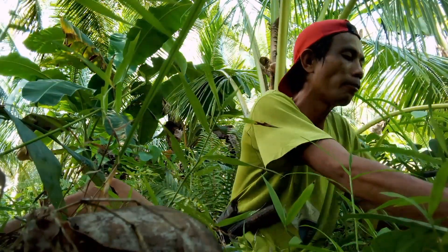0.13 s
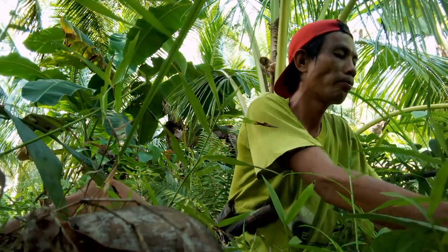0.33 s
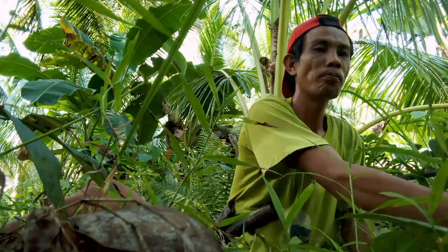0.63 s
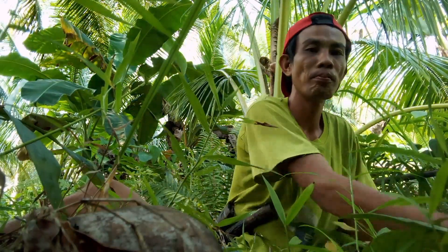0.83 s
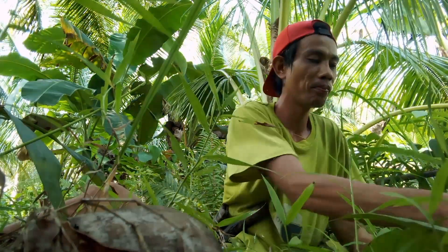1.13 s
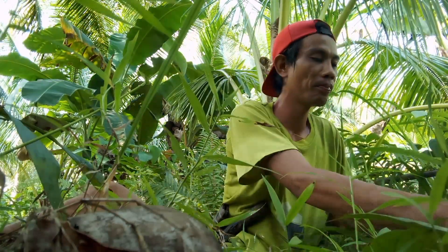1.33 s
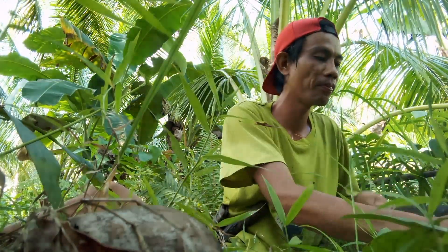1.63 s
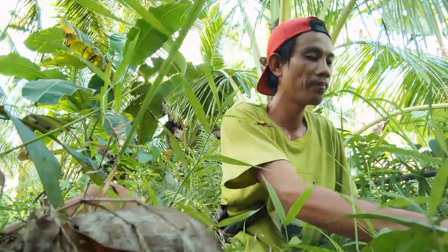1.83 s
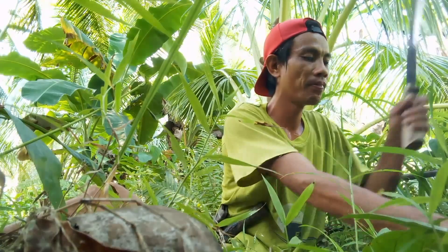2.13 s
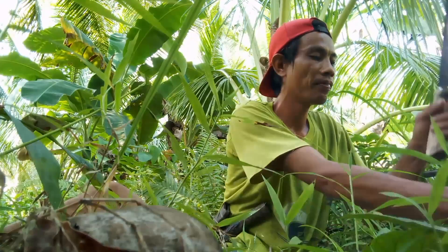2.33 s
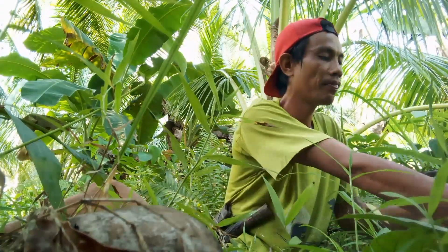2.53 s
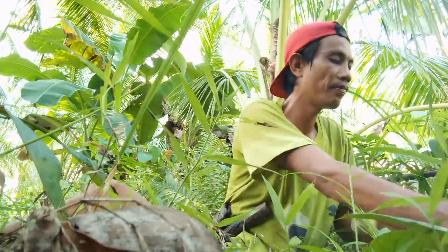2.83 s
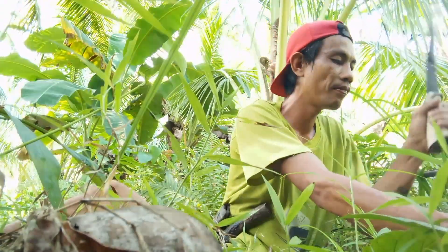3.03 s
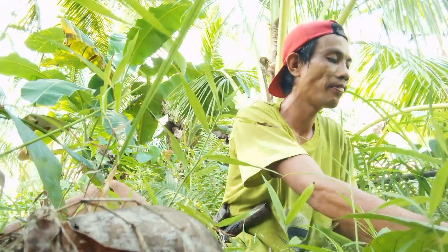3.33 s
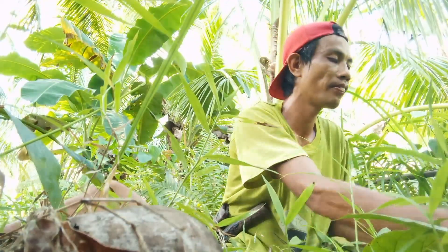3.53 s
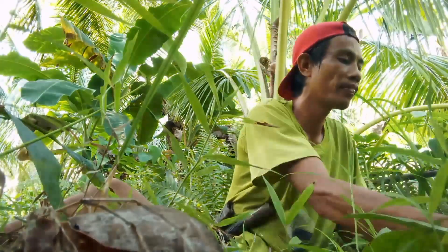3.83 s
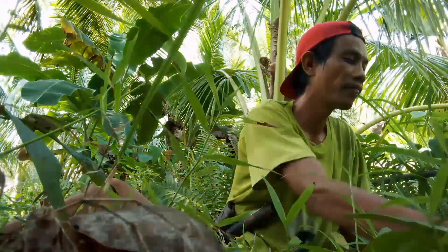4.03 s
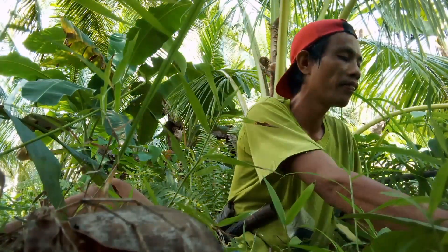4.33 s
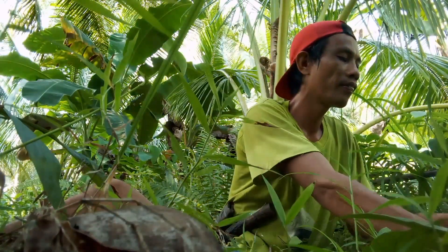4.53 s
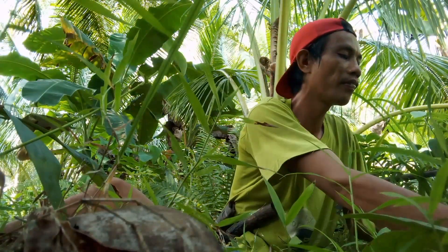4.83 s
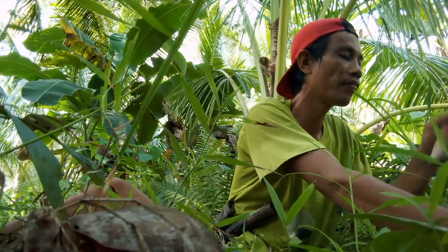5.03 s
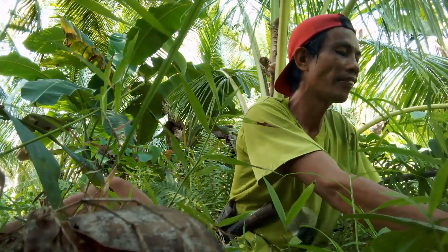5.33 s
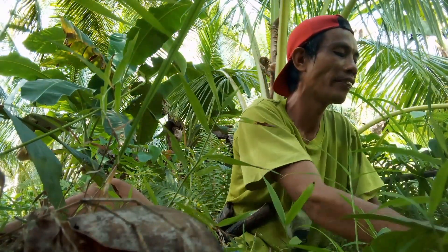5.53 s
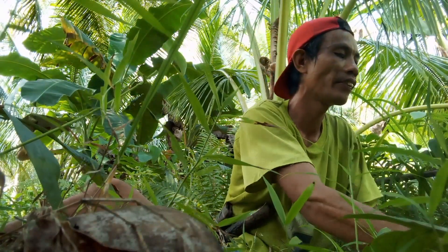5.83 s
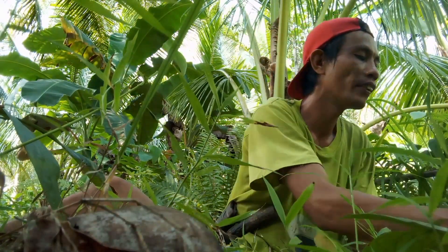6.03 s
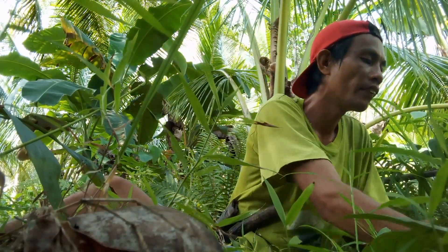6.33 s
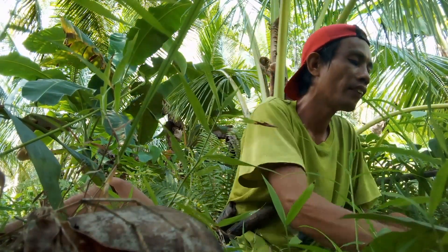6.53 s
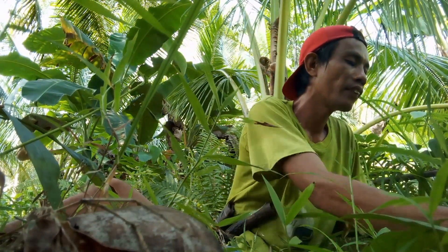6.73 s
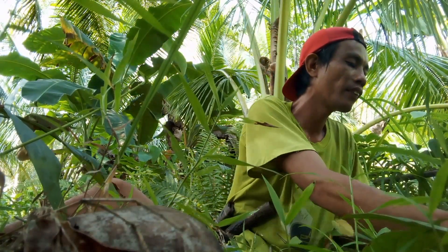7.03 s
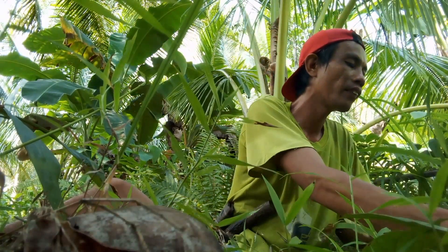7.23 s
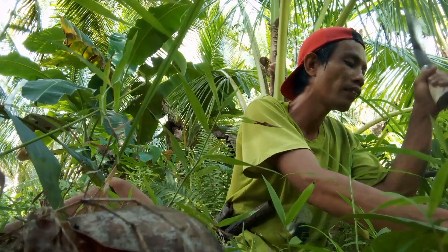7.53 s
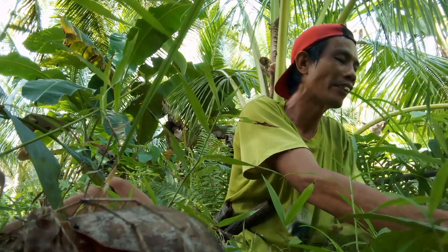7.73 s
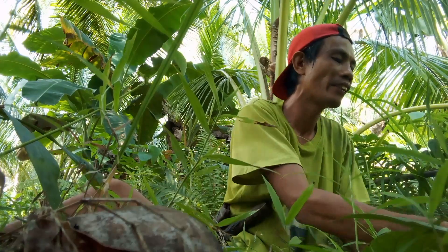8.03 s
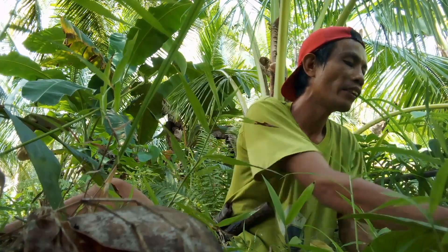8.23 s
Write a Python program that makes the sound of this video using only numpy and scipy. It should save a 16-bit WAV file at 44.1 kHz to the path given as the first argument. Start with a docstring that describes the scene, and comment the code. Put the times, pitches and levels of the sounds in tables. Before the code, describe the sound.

Outdoors in a grove, close to a small microphone, a very quiet low rumble lies under a thin, high, pulsing insect song. At 0.25 s a knife whistles briefly and hits a young coconut: wet pop, crunch, hollow knock around 300 to 400 Hz, slight steel ring. At 0.8 s the husk is prised open in a very short, loud, creaking run of slips, sinking in pitch. Until 3 s there is soft grass rustle, tiny snaps, faint squeaks, scraping and weak taps. A second, duller, rounder blow lands at 3.3 s; leaves swish around 4.05 s and fibres snap at 4.6 s. The third, sharp and cracking with a ground thud, falls at 5.4 s. From 5.9 to 6.8 s the nut scrapes, squeaks and groans amid rustling. After a light tap at 7.3 s, a somewhat softer, hollow chop lands at 7.8 s, then gentle rustling ends it.

```python
"""A low outdoor rumble lies under the high thin song of an insect; at once a knife chops a young coconut.
Full swings whistle, nick the skin and ring the steel; each blow pops and crunches wet husk, knocks the
hollow nut and thuds the ground. Once the husk is prised apart in a creaking run of slips.
Between blows grass rustles in clumped noise, the nut scrapes and hums, fibres snap and wet husk squeaks.
Tones are decaying or swelling sines, textures are coloured noise, and the grove adds a faint tail."""
import sys
import numpy as np
from scipy import signal
from scipy.fft import rfft, irfft
from scipy.io import wavfile
from scipy.ndimage import uniform_filter1d

SR = 44100
rng = np.random.default_rng(int(sys.argv[2]) if len(sys.argv) > 2 else 0)


def dump_mix(stems):
    """Bounce the given channels to the path in sys.argv[1] as a 16-bit WAV at rate SR."""
    frames = np.atleast_2d(stems).T  # one column per channel
    limited = np.clip(frames, -1, 1)  # hard clip at full scale
    pcm = np.round(limited * 32767).astype(np.int16)
    wavfile.write(sys.argv[1], SR, pcm)


N = 369558
TIME = np.arange(N) / SR
AGE = np.arange(SR // 2) / SR  # seconds since an event began
HZ = np.fft.rfftfreq(N, 1 / SR)

# Hard and soft blows on the nut: impact_s, knock_db, knock_pitch_hz, push_s, rebound_delay_s,
# rebound_db (re knock), hollow_ring_db, hollow_pitch_hz, after_ring_t60_s, ground_thud_db,
# wedge_pop_db, pop_pitch_hz, crunch_db, crunch_decay_s, edge_hiss_db
BLOWS = [(0.254, -7, 418, 0.00314, 0.013, -14, -5.5, 290, 0.26, -22.5, -11, 675, -9, 0.0031, -24.5),
         (0.4227, -35.5, 360, 0.005, 0.0066, -4, -19, 297, 0.12, -65.5, -35, 1400, -38.5, 0.0092, -71),
         (1.4201, -39, 407, 0.0025, .011, -17, -38, 318, 0.14, -64, -59, 755, -47, 0.0034, -66),
         (1.952, -31.5, 314, 0.0067, .0135, -11, -19.5, 276.4, 0.12, -32.5, -58, 547, -54.5, 0.0043, -72),
         (3.3072, -8, 374.6, 0.0065, .0092, -9, -31, 332, .06, -32, -27.5, 760, -20.5, 0.0043, -40),
         (3.4205, -37.5, 341, 0.01, .013, -2, -29.5, 273, 0.29, -28.5, -41, 576, -35, 0.0035, -46),
         (3.7888, -39, 394, 0.009, 0.011, -13, -33, 272, .061, -34.5, -29.5, 535, -40, 0.0052, -55),
         (4.6754, -30.5, 406, 0.0044, 0.013, -9, -22.5, 279.6, 0.28, -27.5, -32.5, 948, -35.5, 0.0076, -53),
         (5.432, -7, 388.4, 0.0051, 0.006, -7.5, -20, 275.3, 0.4, -11, -5.5, 680, -8.5, 0.0024, -20.5),
         (7.2674, -33, 399.7, 0.01, .0114, -12.8, -31, 265, 0.11, -23.5, -32.5, 740, -44.5, 0.0047, -57),
         (7.8016, -15, 390, 0.0107, .0115, -11.5, -8.8, 270.2, 0.33, -33, -9.5, 594, -17.5, 0.0054, -28.5)]
# Spectrum of crunching wet fibres: frequency_hz, relative_level_db (per Hz)
CRUNCH_SPECTRUM = [(60, -45.5), (250, -17.5), (450, 2), (750, -1), (1650, -3.5), (2350, -14.5),
                   (3400, -7.5), (5000, -19), (8000, -33), (16000, -28.5)]
# Spectrum of the bright hiss at the cutting edge: frequency_hz, relative_level_db (per Hz)
EDGE_SPECTRUM = [(500, -24), (2000, -7.5), (3500, -0.5), (6000, 3.5), (8000, -1.5), (10000, 3.5),
                 (14000, 6), (16000, -2.5)]
# Spectrum of the nut rubbing on its bed: frequency_hz, relative_level_db (per Hz)
DRAG_SPECTRUM = [(100, -6), (270, 2.5), (420, 0.5), (700, -4), (1100, -17), (2000, -16.5), (5000, -34)]


def gain_of(db):
    """Decibels to amplitude."""
    return 10 ** (np.asarray(db) / 20)


def evened(x):
    """Scales to an rms of one."""
    return x / np.sqrt(np.mean(x ** 2) + 1e-20)


def read(points, hz):
    """Reads a table along a log-frequency axis."""
    f, value = np.transpose(points)
    return np.interp(np.log(hz + 1), np.log(f + 1), value)


def add(mix, s, sound):
    """Mixes a sound in at time s."""
    part = mix[max(round(s * SR), 0):][:len(sound)]
    part += sound[:len(part)]


def coloured(x, spectrum):
    """Shapes a signal with a spectrum, at an rms of one."""
    shape = gain_of(read(spectrum, np.fft.rfftfreq(len(x), 1 / SR)))
    return evened(irfft(rfft(x) * shape, len(x)))


def thinned(x, hz):
    """Takes out the bass below a cutoff."""
    return signal.sosfilt(signal.butter(4, hz, "high", fs=SR, output="sos"), x)


def band(hz, width_hz):
    """Noise in one resonance, at an rms of one."""
    resonance = 1 / (1 + (2 * (HZ - hz) / width_hz) ** 2)
    return evened(irfft(rfft(rng.standard_normal(N)) * resonance, N))


def drift(per_s):
    """Slow chance: random values of unit spread, joined by straight lines."""
    return np.interp(TIME * per_s, np.arange(N // 20), rng.standard_normal(N // 20))


def ring(modes):
    """Dying sines of a struck thing, from (hz, db, t60_s) modes."""
    return sum(gain_of(db - 60 * AGE / t60) * np.sin(2 * np.pi * hz * AGE) for hz, db, t60 in modes)


def swell(hz, push_s):
    """A tone that builds while the blade pushes and is choked as it sticks."""
    u = AGE / push_s
    return u * np.exp((1 - u ** 2) / 2) * np.sin(2 * np.pi * hz * AGE)


def burst(spectrum, decay_s, rise_s=0.0001):
    """Many fibres giving way at once: coloured noise under a fast rise and a decay."""
    noise = coloured(rng.standard_normal(len(AGE)), spectrum)
    return noise * np.exp(-AGE / decay_s) * (1 - np.exp(-AGE / rise_s))


def grains(per_s, spread_db, smooth):
    """Tiny clicks of very unequal size over a smooth hiss."""
    size = gain_of(spread_db * np.minimum(rng.exponential(1, N), 4))
    clicks = size * rng.choice([-1, 1], N) * (rng.random(N) < per_s / SR)
    return evened(clicks) + smooth * rng.standard_normal(N)


def glide(length_s, start_hz, end_hz, purity):
    """A gliding tone that rises and fades; purity is the size of its clean part against its fuzz."""
    u = np.linspace(0, 1, int(length_s * SR))
    fuzz = evened(uniform_filter1d(rng.standard_normal(len(AGE)), size=90))[:len(u)]
    turns = np.cumsum(start_hz * (end_hz / start_hz) ** u) / SR
    level = (purity + fuzz) / np.hypot(purity, 1)
    return level * np.sqrt(4 * u * (1 - u)) * np.sin(2 * np.pi * turns)


def patchy(x, size, depth_db):
    """Brief resonances of each leaf, stalk or rubbed spot; a larger size makes them narrower and longer."""
    z = signal.stft(x, SR, nperseg=size)[2]
    patches = uniform_filter1d(rng.standard_normal(z.shape), size=4, axis=0)
    patches = evened(uniform_filter1d(patches, size=5, axis=1))
    return signal.istft(z * gain_of(depth_db * patches), SR, nperseg=size)[1][:N]


def outdoors():
    """A restless low rumble and the thin pulsing song of an insect, which dips briefly by chance."""
    # Spectrum of the outdoor air: frequency_hz, relative_level_db (per Hz)
    air_spectrum = [(15, -46.5), (25, -13), (78, 2), (127, 1), (317, -10.5), (394, -8.5), (607, -13),
                    (1070, -23), (1740, -20), (3720, -30.5), (7920, -39), (9320, -26.5), (10100, -42),
                    (14800, -33.5), (16000, -49)]
    air = gain_of(-62.0) * coloured(rng.standard_normal(N), air_spectrum)
    rumble = gain_of(-65 + 4.2 * drift(per_s=9.7)) * band(hz=122, width_hz=85)
    song = gain_of(-75.5) * band(hz=9230, width_hz=55)
    song = song + gain_of(-85) * band(hz=9100, width_hz=700)
    song = song + gain_of(-86.5) * band(hz=11400, width_hz=660)
    singing = np.clip(3 * (drift(per_s=16) + 1.3), .2, 1)
    chirring = gain_of(.6 * drift(per_s=22) + 3 * drift(per_s=130))
    return air + rumble + song * singing * chirring


def grove(x):
    """Trunks and fronds scatter a faint tail: noise whose decay time depends on frequency."""
    # Decay of the scattered sound: frequency_hz, t60_s
    decay_times = [(100, 0.53), (330, 0.68), (1000, 0.13), (4000, 0.12), (15000, 0.043)]
    hz, t, z = signal.stft(rng.standard_normal(SR), SR, nperseg=256)
    decay = gain_of(-60 * t / read(decay_times, hz)[:, None])
    z = z * decay * (1 - np.exp(-t / 0.0039))  # the tail builds up softly
    tail = signal.istft(z, SR, nperseg=256)[1]
    return signal.fftconvolve(x, tail / np.linalg.norm(tail))[:N]


def stroke(s, rise_s, fall_s, hold_s=0):
    """One movement: swells up to time s, holds, dies away."""
    roundness = 1.1  # 1 is a cusp with long skirts, 2 a bell that stops soon
    away = np.maximum((s - TIME) / rise_s, (TIME - s - hold_s) / fall_s)
    return np.exp(-np.clip(away, 0, 8) ** roundness)


def movement():
    """Gains of stalks, leaves, scrape and hum: brushes, jolts and slides add up in power."""
    # Faint stirring between the moves, before the handling trims: stalk_db, leaf_db, scrape_db, hum_db
    rest_db = (-78.5, -90, -75, -80.5)
    # Arm and nut brush through grass, before the handling trims:
    # peak_s, rise_s, fall_s, stalk_rustle_db, leaf_hiss_db
    brushes = [(.55, 0.089, 0.057, -60, -62), (.77, 0.13, 0.25, -55.5, -66.5),
               (.97, 0.032, 0.1, -55.5, -62), (1.174, 0.0066, 0.04, -55, -62.5),
               (1.41, 0.074, 0.02, -58.5, -64), (1.675, 0.017, 0.1, -58.5, -65),
               (2.16, 0.064, 0.059, -61, -79.5), (2.72, 0.07, 0.17, -63, -64), (3.0, 0.48, 0.028, -64, -78),
               (3.428, 0.01, 0.011, -52, -71), (3.694, 0.052, 0.019, -60, -71),
               (3.795, 0.037, 0.17, -62, -75), (3.97, 0.0084, 0.023, -49, -54),
               (4.051, 0.053, 0.029, -43.5, -48.5), (4.135, 0.035, 0.16, -57, -62.5),
               (4.42, 0.019, 0.029, -58, -67), (4.538, 0.044, 0.071, -61, -66),
               (5.96, 0.065, 0.061, -53.5, -59), (6.089, 0.044, 0.062, -55, -61),
               (6.32, 0.069, 0.27, -53.5, -73), (6.539, 0.05, 0.056, -51, -53.5),
               (6.77, 0.044, 0.082, -60, -72), (7.429, 0.027, 0.048, -59.5, -58.5),
               (8.099, 0.075, 0.087, -60.5, -67.5), (8.22, 0.081, 0.27, -65.5, -68.5)]
    # The nut is pushed over the ground: peak_s, rise_s, fall_s, scrape_db, hollow_hum_db
    slides = [(1.018, 0.03, 0.2, -61.5, -64), (1.35, 0.07, 0.14, -59, -56.5),
              (2.821, 0.058, 0.078, -58.5, -82.5), (4.039, 0.069, 0.1, -49, -68),
              (5.97, 0.033, 0.96, -55.5, -84), (6.267, 0.0091, 0.17, -43.5, -56),
              (6.361, 0.048, 0.065, -49, -67), (7.43, 0.015, 0.039, -57, -76),
              (8.118, 0.055, 0.71, -57.5, -76)]
    stalk, leaf, scrape, hum = (np.full(N, gain_of(db) ** 2) for db in rest_db)
    for s, rise_s, fall_s, stalk_db, leaf_db in brushes:
        brush = stroke(s, rise_s, fall_s)
        stalk += (gain_of(stalk_db) * brush) ** 2
        leaf += (gain_of(leaf_db) * brush) ** 2
    # a blow shakes the grass; softer blows shake it less and for a shorter time
    jolt_rise_s, jolt_fall_s = 0.0026, 0.09
    for s, knock_db, *_ in BLOWS:
        force = gain_of(.6 * knock_db)  # dB of shaking per dB of knock
        jolt = force * stroke(s + 2 * jolt_rise_s, jolt_rise_s, jolt_fall_s, hold_s=0.1 * force)
        stalk += (gain_of(-49) * jolt) ** 2
        leaf += (gain_of(-57.5) * jolt) ** 2
    for s, rise_s, fall_s, scrape_db, hum_db in slides:
        push = stroke(s, rise_s, fall_s)
        scrape += (gain_of(scrape_db) * push) ** 2
        hum += (gain_of(hum_db) * push) ** 2
    return np.sqrt([stalk, leaf, scrape, hum])


def handling():
    """Stalks and leaves rustle in clumps with a few sharper ticks; the sliding nut scrapes and hums."""
    # Spectrum of rustling stalks: frequency_hz, relative_level_db (per Hz)
    stalk_spectrum = [(100, -7.5), (350, 9), (900, 3.5), (1800, 3), (3500, 4.5), (5500, 0.5), (7800, -10),
                      (11000, -9.5), (16000, -24)]
    # Spectrum of hissing leaves: frequency_hz, relative_level_db (per Hz)
    leaf_spectrum = [(2000, -30.5), (5000, -1), (6900, -1), (7900, -8), (8900, 3), (13000, 2), (16000, 1)]
    stalk, leaf, scrape, hum = movement()
    clumps = gain_of(2.2 * drift(per_s=70))
    ticks = .4 * grains(per_s=70, spread_db=3, smooth=0)
    stalks = clumps * (ticks + grains(per_s=1800, spread_db=3.4, smooth=.65))
    stalks = coloured(patchy(stalks, size=384, depth_db=3.3), stalk_spectrum)
    leaves = clumps * (ticks + grains(per_s=2500, spread_db=3.5, smooth=.6))
    leaves = coloured(patchy(leaves, size=192, depth_db=3.4), leaf_spectrum)
    ground = patchy(grains(per_s=700, spread_db=3, smooth=.5), size=1024, depth_db=4)
    ground = coloured(ground, DRAG_SPECTRUM)
    rustle = gain_of(1.0) * stalk * stalks + gain_of(4.0) * leaf * leaves  # trims of 1 and 4 dB
    return rustle + scrape * ground + hum * band(hz=320, width_hz=55)


def snaps():
    """Fibres break, chips land and leaves flick as noise bursts; wet husk squeaks as gliding tones."""
    # Snapping fibres, falling chips, flicked leaves, before the doubling below:
    # start_s, woody_db, bright_db, decay_s
    snap_events = [(0.331, -42, -55, 0.00093), (.415, -45.5, -70, 0.0037), (1.035, -57, -50, 0.00092),
                   (1.1652, -70, -41.5, 0.0014), (1.387, -77.5, -42, 0.00067), (1.397, -72, -43.5, 0.0016),
                   (2.008, -46, -40, 0.00091), (2.605, -44, -67, 0.00097), (3.284, -54.5, -62.5, 0.013),
                   (3.968, -67, -59, 0.0018), (3.812, -61.5, -53.5, 0.0072), (4.57, -37, -70, 0.0032),
                   (4.588, -46, -52.5, 0.0021), (5.526, -37, -44, 0.0067), (5.946, -59.5, -41.5, 0.0022),
                   (6.087, -38, -42, 0.0048), (6.216, -77, -57, .0015), (6.362, -48, -70, 0.0013),
                   (6.546, -47.5, -44, 0.0019), (6.744, -52, -60.5, 0.0051), (7.2724, -64, -51.5, 0.00097),
                   (7.398, -75, -50, 0.0008), (7.448, -49, -44, 0.0016), (7.911, -48.5, -50.5, 0.011)]
    # Wet surfaces squeak and the hollow nut groans as they rub: start_s, length_s, start_hz, end_hz, level_db
    squeaks = [(1.066, 0.017, 1565, 1930, -44), (1.214, 0.053, 332, 318, -52),
               (1.294, 0.072, 318, 330, -55), (1.69, 0.036, 310, 308, -52), (4.403, 0.04, 5450, 5610, -59),
               (6.265, 0.047, 372, 428, -42), (6.277, 0.054, 1040, 1110, -45), (6.324, .045, 256, 272, -47),
               (6.363, 0.055, 350, 591, -49.5)]
    # Spectrum of a woody snap: frequency_hz, relative_level_db (per Hz)
    woody_spectrum = [(100, -14), (600, -4), (1500, 0), (2400, -6), (3600, -0.5), (5500, -13.5),
                      (8000, -27), (16000, -33.5)]
    out = np.zeros(N)
    for s, woody_db, bright_db, decay_s in snap_events:
        woody = burst(woody_spectrum, decay_s, rise_s=decay_s / 4)
        bright = burst(EDGE_SPECTRUM, decay_s, rise_s=decay_s / 4)
        # doubled, as the slow rise softens the burst
        add(out, s, 2 * (gain_of(woody_db) * woody + gain_of(bright_db) * bright))
    for s, length_s, start_hz, end_hz, db in squeaks:
        tone = glide(length_s, start_hz, end_hz, purity=2)
        overtone = glide(length_s, 2 * start_hz, 2 * end_hz, purity=2)
        add(out, s, gain_of(db) * (tone + gain_of(-11.5) * overtone))
    return out


def tears():
    """The twisted blade splits the husk in a fast, uneven run of slips that sinks and dulls; a flap hums on."""
    # Husk prised apart: start_s, length_s, slips_per_s, level_db, fade_db (over the length; negative grows),
    # bass_cutoff_hz, freed_flap_hum_db
    tear_events = [(0.76, 0.018, 300, -29, -4, 455, -32), (0.8053, 0.05, 310, -13, 11, 224, -8.5)]
    # Ring of the splitting husk, before sag and dulling: pitch_hz, level_db, t60_s
    husk_modes = [(269, -11, 0.096), (328, 0.5, 0.0352), (601, -14.5, 0.076), (692, -9, 0.033),
                  (898, -17.5, 0.09), (1253, -18.5, 0.047), (1545, -16.5, 0.045), (1775, -18, 0.055),
                  (1990, -19, 0.059), (2860, -21.5, 0.026), (3426, -16.5, 0.034), (3880, -28.5, 0.012)]
    # Spectrum of the crack of each slip: frequency_hz, relative_level_db (per Hz)
    split_spectrum = [(200, -8), (600, 2), (1950, -14), (2300, -17), (2700, -11), (4150, -11.5),
                      (4550, -17.5), (8000, -33.5), (16000, -34.5)]
    sag, jitter = 0.124, .2  # share of pitch lost over the length; timing spread in slip periods
    flap_rise_s = 0.017
    out = np.zeros(N)
    for s, length_s, per_s, db, fade_db, cutoff_hz, flap_db in tear_events:
        flap = ring([(247, flap_db, 0.088)]) * (1 - np.exp(-AGE / flap_rise_s))
        add(out, s + length_s - flap_rise_s, flap)
        for k, (late, size_db) in enumerate(rng.standard_normal((20, 2))):
            done = k / per_s / length_s
            pitch = 1 - sag * min(done, 1)  # the loosening flap rings lower
            dull_db = 3 * done  # lost for every tenfold rise in frequency
            modes = [(hz * pitch, level - dull_db * np.log10(hz / husk_modes[0][0]), t60)
                     for hz, level, t60 in husk_modes]
            slip = ring(modes) + gain_of(-5 - dull_db) * burst(split_spectrum, decay_s=0.0017)
            release = np.clip((1.35 - done) / 0.45, 0, 1)  # the slips die out past the end
            level = release * gain_of(db - fade_db * done + size_db)
            add(out, s + max(k + jitter * late, 0) / per_s, level * thinned(slip, cutoff_hz))
    return out


def swings():
    """Air whistles higher as the blade speeds up; the blade nicks the skin, then sticks and rings."""
    # Full swings: impact_s, whistle_db, skin_bite_db, bite_lead_s, steel_ring_db
    swing_events = [(0.254, -48.5, -26, 0.0049, -39.5), (3.3106, -73, -34.5, 0.0038, -52),
                    (5.432, -47, -31, 0.0045, -38.5), (7.802, -47, -25, 0.0054, -34)]
    # Ring of the steel, re the steel ring level: pitch_hz, level_db, t60_s
    blade_modes = [(2046, 2, 0.097), (1570, -2, 0.087), (4070, -9.5, .14)]
    whistle_s = 0.031
    out = np.zeros(N)
    for s, whistle_db, bite_db, lead_s, steel_db in swing_events:
        whistle = glide(whistle_s, start_hz=1495, end_hz=3160, purity=.3)
        whistle = whistle * np.linspace(.3, 1, len(whistle))  # weighted towards the impact
        add(out, s - whistle_s, gain_of(whistle_db) * whistle)
        bite = burst(CRUNCH_SPECTRUM, decay_s=0.0028)
        bite = bite + gain_of(-6) * burst(EDGE_SPECTRUM, decay_s=0.0038)
        add(out, s - lead_s, gain_of(bite_db) * bite)
        add(out, s, gain_of(steel_db) * ring(blade_modes))
    return out


def pop(hz):
    """The blade wedges the husk open: a few cycles that fall quickly in pitch as the cut deepens."""
    rise_s = 0.0011
    sweep, sweep_s = 0.69, .0009  # starts this share higher and falls with this time constant
    u = AGE / rise_s
    turns = hz * (AGE + sweep * sweep_s * (1 - np.exp(-AGE / sweep_s)))
    return u * np.exp(1 - u) * np.sin(2 * np.pi * turns)


def blows():
    """The husk pops and crunches, the nut knocks and rebounds, its cavity rings on and the ground thuds."""
    # Partials of the nut's knock: multiple_of_knock_pitch, level_db
    knock_partials = [(.66, -14), (1.001, 2.5), (1.22, -18.5), (2.148, -25.5)]
    # Ring of the hard shell: pitch_hz, level_db (re the pop), t60_s
    shell_modes = [(1335, -26, 0.023), (1580, -16, 0.04)]
    crack_lag_s = .0014  # the husk gives way just after the blade lands
    out = np.zeros(N)
    thud = swell(hz=128, push_s=.0075) * .4 + swell(hz=222, push_s=.0055)
    for (s, knock_db, knock_hz, push_s, rebound_s, rebound_db, hollow_db, hollow_hz, t60,
         thud_db, pop_db, pop_hz, crunch_db, decay_s, edge_db) in BLOWS:
        knock = sum(gain_of(db) * swell(knock_hz * k, push_s) for k, db in knock_partials)
        # the cavity dies quickly at first, then rings on faintly
        hollow = ring([(hollow_hz, hollow_db, .075), (hollow_hz, hollow_db - 16.5, t60)])
        hollow = hollow * (1 - np.exp(-AGE / 0.0027))
        add(out, s, gain_of(knock_db) * knock + hollow + gain_of(thud_db) * thud)
        crack = gain_of(crunch_db) * burst(CRUNCH_SPECTRUM, decay_s)
        crack = crack + gain_of(edge_db) * burst(EDGE_SPECTRUM, decay_s)
        wedge = gain_of(pop_db) * (pop(pop_hz) + ring(shell_modes))
        add(out, s + crack_lag_s, crack + wedge)
        # a few more fibres part as the nut springs back against the blade
        rebound = gain_of(knock_db + rebound_db) * knock
        late_crunch = gain_of(crunch_db - 20.5) * burst(CRUNCH_SPECTRUM, decay_s=0.0075)
        add(out, s + rebound_s, rebound + late_crunch)
        # the jolted nut settles in its bed of grass
        add(out, s, gain_of(knock_db - 34.5) * burst(DRAG_SPECTRUM, decay_s=0.061, rise_s=0.0026))
    return out


def scene():
    """All sources in two channels that differ only in the treble."""
    work = blows() + swings() + tears() + snaps()
    mid = work + gain_of(-35.0) * grove(work) + handling() + outdoors()
    scatter = rng.standard_normal(128)
    side = np.convolve(mid, scatter / np.linalg.norm(scatter))[:N]
    side = gain_of(-14) * thinned(thinned(side, hz=4700), hz=4700)
    return np.array([mid + side, mid - side])


def record(dry):
    """The small microphone loses the deep bass and rounds off the hardest blows; then the top is cut."""
    thin = signal.sosfilt(signal.butter(2, 42, "high", fs=SR, output="sos"), dry)
    ceiling, top_hz = .76, 16100
    rounded = thin / (1 + (thin / ceiling) ** 6) ** (1 / 6)
    low_pass = signal.firwin(511, top_hz, window=("kaiser", 9), fs=SR)
    return signal.oaconvolve(rounded, low_pass[None], "same")


dry = scene()
out = record(dry)
dump_mix(out)
```